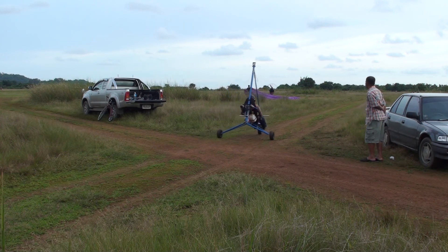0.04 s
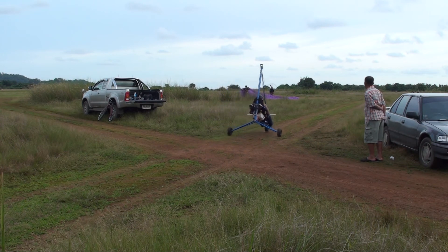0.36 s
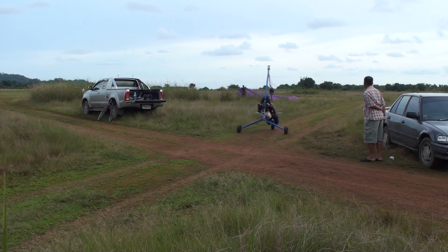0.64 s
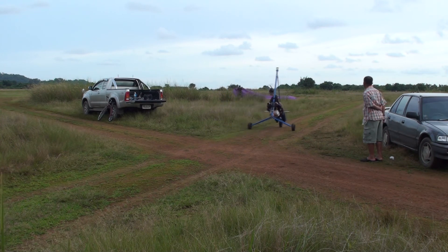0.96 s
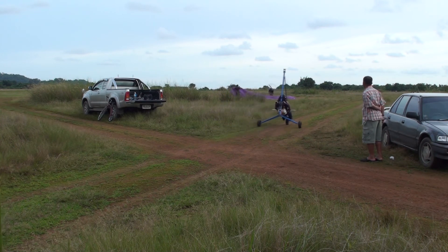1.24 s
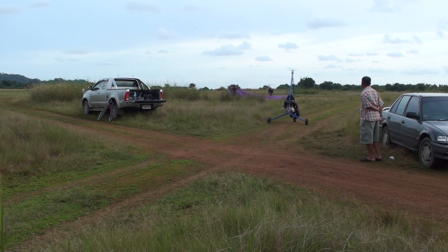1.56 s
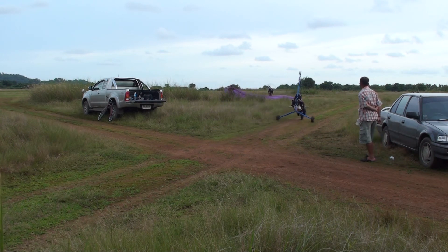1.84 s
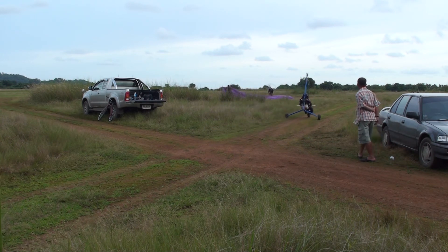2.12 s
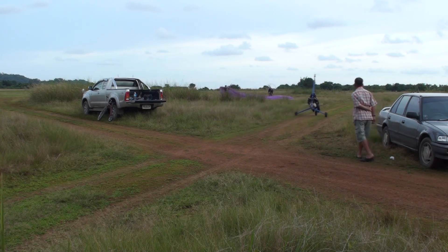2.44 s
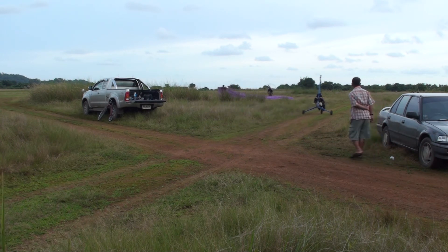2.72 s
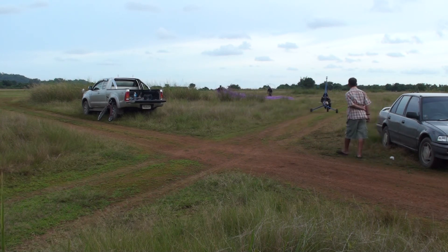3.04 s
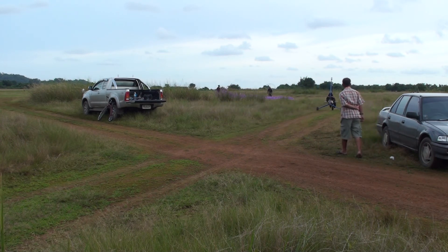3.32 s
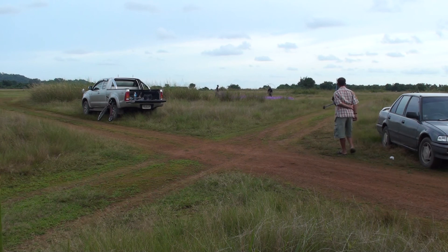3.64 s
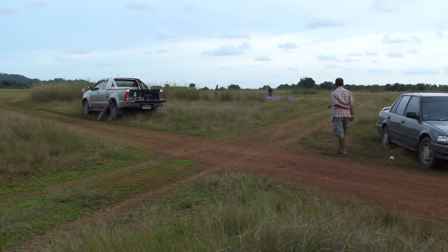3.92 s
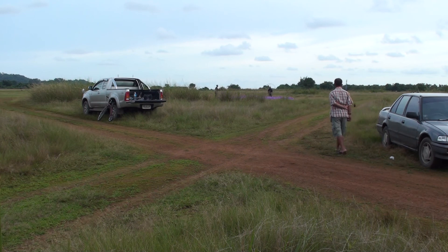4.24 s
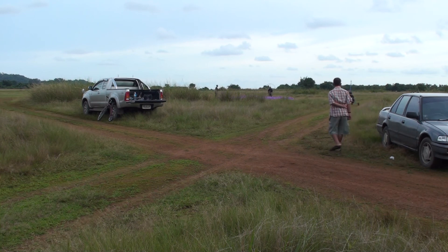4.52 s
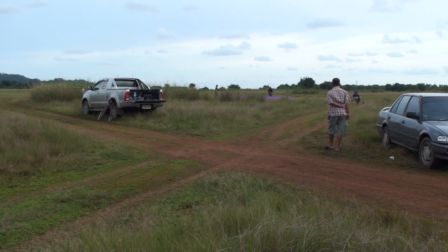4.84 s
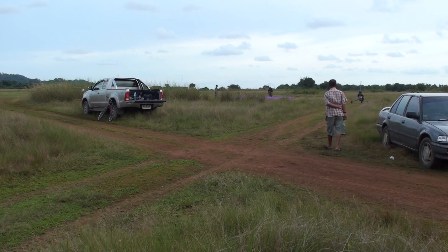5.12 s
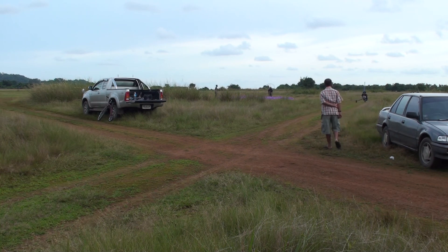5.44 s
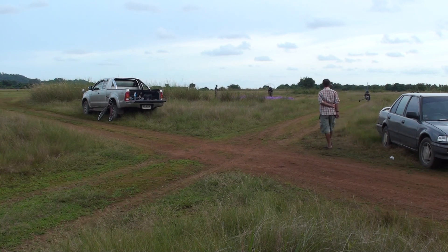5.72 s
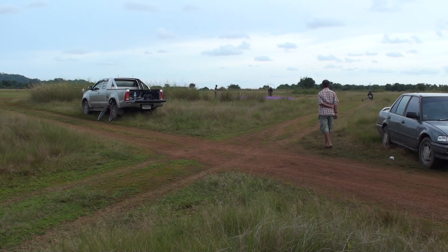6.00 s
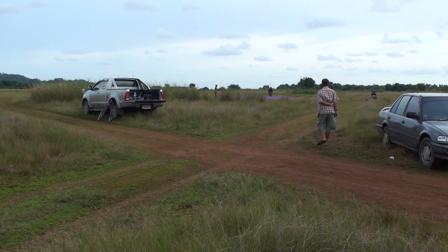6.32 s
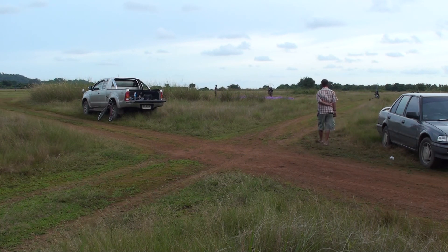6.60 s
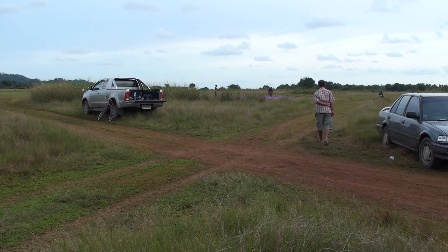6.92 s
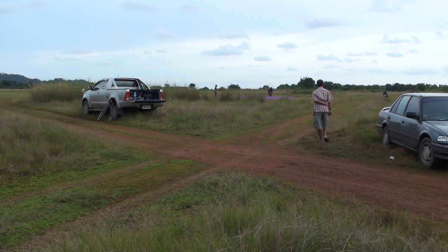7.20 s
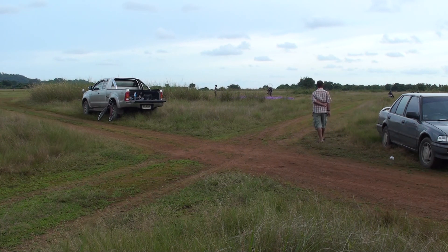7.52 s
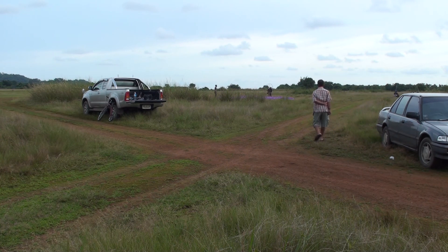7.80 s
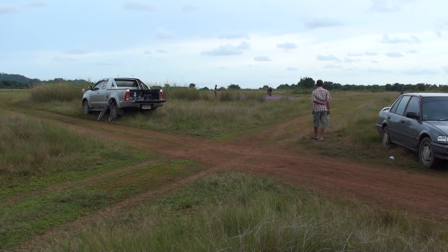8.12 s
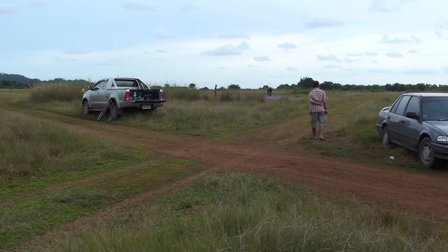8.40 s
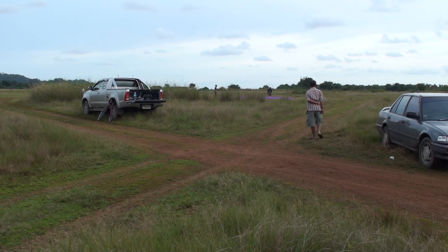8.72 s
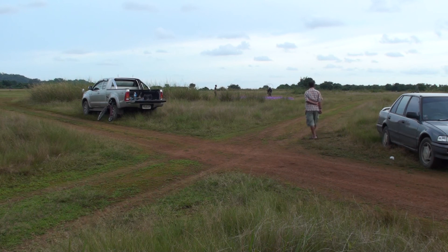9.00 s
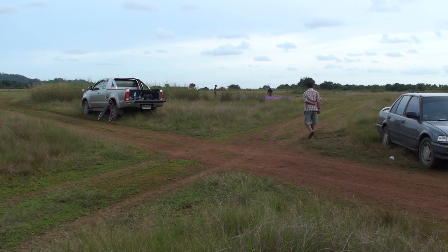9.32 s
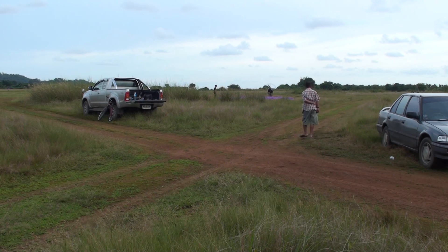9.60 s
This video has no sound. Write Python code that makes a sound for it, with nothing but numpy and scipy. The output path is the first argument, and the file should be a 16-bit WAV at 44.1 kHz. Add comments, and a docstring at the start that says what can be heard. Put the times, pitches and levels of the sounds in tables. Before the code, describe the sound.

A three-wheeled craft with two small jet turbines rolls away across an open grassy field. Its loud, rushing roar swells and swirls under a very high whine. After about four seconds it throttles back: the roar sinks and the whine splits into two tones gliding steadily down. Heard in stereo from a fixed spot, it fades toward the right over a low rumble and faint hiss.

```python
"""On a grassy field, a stereo pair of microphones hears a trike with two small jet turbines roll away.
Close by at first, the exhausts roar, swelling briefly and coloured by moving echoes off the ground and
a parked car, while the two shafts whine at nearly one pitch. After four seconds it throttles back: the
roar sinks and the whines part as they spool down. Farther out it bears right and the whines' octaves
emerge, over the low rumble and faint hiss that lie on the field throughout."""
import sys
import numpy as np
from scipy import signal
from scipy.fft import rfft, irfft
from scipy.io import wavfile

SR = 44100
rng = np.random.default_rng(int(sys.argv[2]) if len(sys.argv) > 2 else 0)


def persist_wave(psi):
    """Save psi, clipped to +-1, as 16-bit WAV."""
    counts = np.round(np.clip(psi, -1, 1) * 32767).astype(np.int16)
    wavfile.write(sys.argv[1], SR, np.atleast_2d(counts).T)


N = 429975
FRAME, HOP = 1024, 256
TIME = np.arange(N) / SR
FRAME_S = np.arange(N // HOP + 2) * HOP / SR
BIN_HZ = np.maximum(np.arange(FRAME // 2 + 1) * SR / FRAME, 1)
CUTOFF_HZ = 15600


def from_db(db):
    """Decibels to gain."""
    return 10 ** (np.asarray(db) / 20)


def in_time(rows, times):
    """The columns of a curve, read at the given times."""
    time_s, *columns = np.transpose(rows)
    return [np.interp(times, time_s, column) for column in columns]


def in_pitch(rows):
    """The columns of a spectrum, read at every frequency bin."""
    hz, *columns = np.transpose(rows)
    return [np.interp(np.log(BIN_HZ), np.log(hz), column)[:, None] for column in columns]


def octaves_from(centre_hz):
    """Distance of every frequency bin from a pitch."""
    return np.log2(BIN_HZ[:, None] / centre_hz)


def glide(start_s, end_s, first, last, fade_share=0.15):
    """A value slides from first to last as the trike passes a patch of ground; also its presence 0-1."""
    progress = np.clip((FRAME_S - start_s) / (end_s - start_s), 0, 1)
    edge = np.minimum(np.minimum(progress, 1 - progress) / fade_share, 1)
    return first * (last / first) ** progress, np.sin(np.pi / 2 * edge)


# Phase by which the left microphone leads the right: pitch_hz, lead_rad
LEFT_LEAD = [(60, -0.78), (260, -0.75), (700, -0.62), (1640, -0.18), (4200, -0.51), (6500, 0.36),
             (9000, 0.99), (12000, -0.51)]

def stereo_noise(density, image):
    """Noise of the given amplitude per root Hz (bins x frames), placed between the microphones."""
    white = rng.standard_normal((2, (len(FRAME_S) - 1) * HOP)) * np.sqrt(SR / 2)
    common, apart = signal.stft(white, nperseg=FRAME, noverlap=FRAME - HOP)[2]
    pan_db, likeness = in_pitch(image)
    lead_rad, = in_pitch(LEFT_LEAD)
    common = common * np.sqrt((1 + likeness) / 2)
    apart = apart * np.sqrt((1 - likeness) / 2)
    lean = from_db(pan_db / 2) * np.exp(.5j * lead_rad)
    pair = np.array([(common + apart) * lean, (common - apart) / lean]) * 2 / abs(lean + 1 / lean)
    return signal.istft(pair * density, nperseg=FRAME, noverlap=FRAME - HOP)[1][:, :N]


# Soft grass between trike and microphones:
# start_s, end_s, first_hz, last_hz, half_width_octaves, depth_db
GRASS_PATCHES = [(-.1, .53, 820, 840, .18, 4), (-.3, .89, 2390, 2600, .12, 2.5),
                 (.7, 1.61, 2880, 3340, .082, 4), (.15, 1.38, 560, 660, .22, 6),
                 (.85, 1.5, 850, 1080, .16, 4), (1.5, 2.15, 1200, 2250, .19, 7),
                 (2.1, 2.8, 2150, 2950, .13, 5), (4.05, 4.5, 1400, 1500, .25, 8),
                 (4.41, 6.1, 1260, 1420, .14, 5), (6, 7, 2900, 3000, .11, 3),
                 (4.3, 6.15, 1040, 950, .17, 7), (5.85, 7.9, 900, 730, .13, 6.5),
                 (7.55, 8.3, 3100, 2000, .2, 5), (8.05, 8.65, 2000, 1000, .3, 7),
                 (8.35, 10.1, 1060, 820, .3, 7)]

def grass():
    """Each patch swallows a band that slides with the angle of the path to the microphones."""
    loss_db = 0
    for *path, width_octaves, depth_db in GRASS_PATCHES:
        centre_hz, presence = glide(*path)
        band = np.exp(-(octaves_from(centre_hz) / width_octaves) ** 2)
        loss_db = loss_db + depth_db * presence * band
    return from_db(-loss_db)


def reflection(lag_ms, strength, blur_hz, low_hz):
    """A late copy cuts a comb; long waves bend round the reflector and its unevenness blurs the top."""
    hz = BIN_HZ[:, None]
    turns = hz * lag_ms / 1000
    returned = strength / (1 + (hz / blur_hz) ** 2) / (1 + (low_hz / hz) ** 2)
    return abs(1 + returned * np.exp(-2j * np.pi * turns))


# Echo off a parked car: time_s, lag_ms, strength_ratio
PARKED_CAR = [(0, 4.8, .12), (.5, 4.3, .35), (.8, 3.5, .52), (1.1, 2.62, .55), (1.47, 2.02, .42),
              (1.8, 1.1, .15), (2.2, .8, 0)]
# Hard ground that mirrors the jets: start_s, end_s, first_lag_ms, last_lag_ms, strength_ratio
HARD_GROUND = [(-2.25, 3.53, 0.98, 0.3, 0.17), (3, 5.9, 0.45, 0.48, 0.18), (5.5, 8.63, 0.51, 0.62, 0.52),
               (6.5, 10, 0.79, 0.61, 0.15)]

def echoes():
    """Car and ground echoes reach the microphones just behind the roar; their combs move as it rolls."""
    gain = reflection(*in_time(PARKED_CAR, FRAME_S), blur_hz=5000, low_hz=402)
    for *path, strength in HARD_GROUND:
        lag_ms, presence = glide(*path)
        gain = gain * reflection(lag_ms, strength * presence, blur_hz=4100, low_hz=60)
    return gain


# Brief swells and dips in sliding bands of the roar at the microphones, some broad, some narrow:
# peak_s, rise_s, centre_hz, half_width_octaves, lift_db, climb_octaves_per_rise
ROAR_SWELLS = [(.18, 0.16, 1190, 0.15, 4.5, 0.31), (.56, 0.14, 1580, .25, 3.5, 0.12),
               (1.019, 0.091, 1220, 0.12, 8, .05), (1.09, 0.067, 1930, .12, 7, 0.0094),
               (1.28, 0.24, 2350, 0.19, 2, 0.088), (1.25, .35, 4050, .14, 2.5, 0.14),
               (1.47, 0.22, 700, 0.19, 6.5, 0.27), (1.61, 0.048, 2380, .15, 4, -0.048),
               (1.71, 0.06, 1820, .1, 11, 0.052), (1.63, 0.077, 5000, .8, 3.5, 0.0026),
               (1.92, 0.12, 2580, 0.15, 4, 0.043), (2.07, 0.12, 7150, 1.4, 5, .15),
               (2.18, 0.1, 1090, .6, 4.5, 0.41), (2.33, 0.06, 5200, .45, 3, 0.52),
               (2.43, 0.19, 5000, 1.06, 6.5, 0.12), (2.68, 0.12, 3600, 0.54, -1, 0.16),
               (2.9, .14, 3600, 1.1, 6, -0.062), (3.24, 0.084, 4530, 0.43, 6.5, 0.2),
               (3.36, 0.11, 3260, 0.3, 7.5, 0.17), (3.15, .15, 700, 0.28, 1.5, .35),
               (3.52, 0.32, 1350, 0.29, 2.5, .42), (3.6, 0.074, 6300, 0.69, 5.5, .15),
               (3.7, 0.067, 3290, 0.78, 6.5, 0), (3.87, 0.27, 2800, 0.31, -6.5, 0.14),
               (4.01, 0.041, 2600, .25, 6, 0.1), (4.07, 0.11, 4400, 0.94, 6.5, 0.44),
               (4.35, 0.059, 2650, 0.12, 7, -0.19), (4.68, 0.19, 2270, .44, 4, 0),
               (5.78, .2, 690, 0.14, 3.5, 0), (6.4, .22, 5600, 0.67, 3, -0.008),
               (6.72, 0.53, 2500, .14, 5.5, 0.07), (7.65, 0.36, 1580, 0.18, 4.5, -.08),
               (7.97, 0.14, 3400, 0.55, 5, -.05), (8.2, 0.34, 1230, 0.17, 2.5, -0.097),
               (9.6, .7, 2780, 0.13, 5, 0.036)]

def swells(fall_share=0.35):
    """A sliding band of the roar swells or dips, then returns more quickly (dB, bins x frames)."""
    total_db = 0
    for peak_s, rise_s, centre_hz, width_octaves, lift_db, climb in ROAR_SWELLS:
        age = (FRAME_S - peak_s) / rise_s
        swell = np.exp(-np.where(age < 0, age, age / fall_share) ** 2)
        offset_octaves = octaves_from(centre_hz) - climb * np.clip(age, -2, 2)
        total_db = total_db + lift_db * swell * np.exp(-(offset_octaves / width_octaves) ** 2)
    return total_db


# How much the air over the field swirls the roar: time_s, depth_db
SWIRL_DEPTH = [(0, 1.5), (2.3, 1.8), (5, 2), (9.75, 1.1)]

def swirl(rate_hz=11, climb_s=0.047, bands=36):
    """Moving air focuses and thins the roar in patches that climb in pitch (dB, bins x frames)."""
    log_pitches = np.linspace(np.log(300), np.log(CUTOFF_HZ), bands)
    moments_s = np.arange(400) / rate_hz - 1
    patches = rng.standard_normal((bands, len(moments_s)))
    delays_s = climb_s * (log_pitches - log_pitches[0])
    over_time = np.array([np.interp(FRAME_S - s, moments_s, row) for s, row in zip(delays_s, patches)])
    over_pitch = np.array([np.interp(np.log(BIN_HZ), log_pitches, row) for row in np.eye(bands)])
    depth_db, = in_time(SWIRL_DEPTH, FRAME_S)
    return depth_db * (over_pitch.T @ over_time)


# Low roar at the left microphone: time_s, gain_db
LEFT_BASS = [(3, -1.5), (4, 0), (5.3, -6), (9.75, -5.5)]

def low_lean(below_hz=700):
    """Farther out the low roar leans to the right (gain, microphones x bins x frames)."""
    lean_db, = in_time(LEFT_BASS, FRAME_S)
    left = from_db(lean_db / (1 + (BIN_HZ[:, None] / below_hz) ** 4))
    return np.array([left, np.ones_like(left)])


# Colour of the jets: pitch_hz, relative_density_db
JET_COLOUR = [(30.0, -48), (80.0, -25.5), (130.0, -17), (190.0, -9), (330.0, -2), (500.0, -1),
              (850.0, -0.5), (1300.0, 0), (1800.0, -2), (2500.0, -3.5), (3100.0, -5.5), (4300.0, -9),
              (6500.0, -11), (9700.0, -15.5), (11600.0, -16), (13500.0, -23.5), (15500.0, -40)]
# Rumble, roar, rush and hiss, from large eddies to small: low_hz, high_hz
EDDY_RANGES = [(80, 250), (250, 800), (1000, 2400), (2800, 4500)]
# Each range as the trike recedes, before swells, swirl, treble tilt and trim: time_s, level_db
RUMBLE_LEVEL = [(0, -41.5), (1.8, -41.5), (4.3, -48.5), (5.4, -55.5), (7.3, -70), (8.5, -58), (9.75, -52)]
ROAR_LEVEL = [(0, -36), (1.3, -31.5), (2.1, -33.5), (3.1, -30.5), (4.1, -33.5), (5.2, -39.5), (5.9, -42),
              (7.1, -48.5), (8.3, -51.5), (9.75, -60)]
RUSH_LEVEL = [(0, -26.5), (.6, -28), (1.15, -30), (1.6, -30.5), (1.9, -31.5), (2.15, -30.5), (2.35, -27),
              (2.8, -28.5), (3, -31), (3.2, -28.2), (3.5, -28), (3.72, -26), (3.85, -29.5), (4.03, -31.5),
              (4.13, -36), (4.6, -36), (5, -40), (5.25, -48), (5.9, -48), (6.15, -44), (6.55, -46.5),
              (7.15, -52.5), (8.05, -53), (8.45, -60.5), (9.75, -64.5)]
HISS_LEVEL = [(0, -32.5), (1.3, -33), (1.8, -36), (2.6, -38.5), (3.05, -38), (3.5, -36), (3.9, -38.5),
              (4.25, -40.5), (4.5, -43.5), (4.8, -46), (5.5, -54), (6.5, -54.5), (8.4, -64.5), (9.75, -72)]
# The jets between the microphones: pitch_hz, left_over_right_db, likeness_ratio
JET_STEREO = [(60, -7, 0.2), (120, -5.5, 0.17), (300, -3, 0.91), (700, -2.5, 1), (1300, -5, 0.87),
              (2380, -4.5, 0.9), (4940, -9.5, 0.79), (7600, -10, 0.64), (9700, -1.5, 0.5),
              (14000, -8.5, 0.8)]

def exhaust(air_knee_hz=4370):
    """Jet mixing noise: each range of eddy sizes has its own strength; the path combs and swirls it."""
    colour = from_db(in_pitch(JET_COLOUR)[0]) * grass() * echoes()
    tilt_db_per_octave = 2 - 0.48 * FRAME_S   # the air dulls the top with distance
    gain_db = swells() + tilt_db_per_octave * np.maximum(octaves_from(air_knee_hz), 0)
    log_centres = np.log(EDDY_RANGES).mean(axis=1)
    levels = [RUMBLE_LEVEL, ROAR_LEVEL, RUSH_LEVEL, HISS_LEVEL]
    for (low_hz, high_hz), curve, this_range in zip(EDDY_RANGES, levels, np.eye(len(levels))):
        level_db, = in_time(curve, FRAME_S)
        power = (colour[(BIN_HZ >= low_hz) & (BIN_HZ < high_hz)] ** 2).sum(axis=0) * SR / FRAME
        share = np.interp(np.log(BIN_HZ), log_centres, this_range)[:, None]
        gain_db = gain_db + share * (level_db - 10 * np.log10(power))
    return stereo_noise(colour * from_db(gain_db + swirl()) * low_lean(), JET_STEREO)


def drift(rate_hz, count=8192):
    """A smooth random curve of spread 1 that changes about rate_hz times a second."""
    hz = np.arange(count // 2 + 1) * SR / N
    slow = irfft(rfft(rng.standard_normal(count)) / (1 + (hz / rate_hz) ** 2), count)
    return np.interp(TIME, np.linspace(0, N / SR, count), slow / slow.std())


def whine(speed, levels, pan_db, wander_hz, flutter_hz, apart, scatter=0.3):
    """A shaft's tone and octave; the air scatters both, so they flutter apart at the two microphones."""
    shaft_hz, = in_time(speed, TIME)
    phase = 2 * np.pi * np.cumsum(shaft_hz + wander_hz * drift(5.67)) / SR
    pair = np.zeros((2, N))
    for harmonic, curve in enumerate(levels, 1):
        level_db, = in_time(curve, TIME)
        shared = 1 + scatter * (drift(flutter_hz) + 1j * drift(flutter_hz))
        fading = shared + apart * np.array([drift(flutter_hz), drift(flutter_hz)])
        rms = np.sqrt(np.mean(abs(fading) ** 2) / 2)
        tone = np.real(fading * np.exp(1j * harmonic * phase)) / rms
        pair += tone * from_db(level_db) * (harmonic * shaft_hz < SR / 2)
    return pair * from_db([[pan_db / 2], [-pan_db / 2]])


# Speed of each shaft: time_s, pitch_hz
SHAFT_A = [(0, 11365), (.55, 11420), (2.2, 11425), (3.1, 11395), (4.25, 11380), (4.4, 11270), (4.55, 11120),
           (4.8, 10630), (5.25, 9760), (5.5, 9370), (6, 8780), (6.4, 8200), (7, 7395), (7.28, 7096),
           (7.55, 6850), (8, 6350), (8.45, 5840), (9, 5300), (9.5, 4835), (9.75, 4620)]
SHAFT_B = [(0, 11380), (.6, 11600), (1.7, 11610), (3.5, 11590), (4.1, 11600), (4.35, 11390), (4.55, 11140),
           (5, 10370), (5.5, 9600), (6, 9020), (6.4, 8570), (7, 8000), (7.75, 7170), (8, 6962), (9, 6222),
           (9.75, 5680)]
# Each shaft's tone, swelling and fading across the field, before trim and pan: time_s, level_db
TONE_A = [(0, -46), (.15, -54), (.5, -39), (1.55, -42), (1.7, -47), (2.1, -42), (2.65, -51), (3.05, -41.5),
          (3.34, -45), (3.55, -56), (3.9, -48), (4.35, -55), (4.54, -53), (4.95, -57), (5.5, -61),
          (5.7, -55), (6.2, -56), (6.55, -52.5), (6.95, -61), (7.33, -53), (7.48, -68), (7.66, -57),
          (8.05, -68), (8.33, -61), (8.62, -70), (9.12, -72), (9.53, -59), (9.75, -68)]
TONE_B = [(0, -49), (.2, -56), (.65, -46), (1.4, -48), (1.7, -49), (2, -48), (2.25, -41), (2.5, -51),
          (3.35, -50), (3.44, -38), (3.65, -49), (4.35, -58), (4.54, -45), (4.66, -58), (5.5, -64),
          (5.9, -59), (6.3, -54), (6.65, -54), (6.8, -65), (7.2, -55), (7.55, -61), (7.98, -51), (8.3, -59),
          (8.8, -63), (9.1, -67), (9.75, -68)]
# Their octaves, which emerge as the pitch sinks, before trim and pan: time_s, level_db
OVERTONE_A = [(6.65, -62), (6.8, -70), (7.21, -71), (7.3, -64), (7.5, -69), (7.76, -60), (7.9, -66),
              (8.14, -58), (8.38, -75), (8.74, -59), (9, -62.5), (9.47, -55.5), (9.75, -57)]
OVERTONE_B = [(7.11, -63), (7.25, -70), (7.5, -69), (7.61, -62), (7.75, -71), (7.85, -55), (7.99, -62),
              (8.17, -58), (8.55, -68), (8.96, -58), (9.22, -62), (9.35, -57), (9.75, -57)]

def turbines():
    """Two shafts, right of centre, hold full speed and then coast down at their own rates."""
    first = whine(SHAFT_A, [TONE_A, OVERTONE_A], pan_db=-6, wander_hz=4.1, flutter_hz=21, apart=0.47)
    second = whine(SHAFT_B, [TONE_B, OVERTONE_B], pan_db=-8.5, wander_hz=5.8, flutter_hz=15, apart=0.54)
    return first + from_db(-1.4) * second


# Background of the open field: pitch_hz, density_db
FIELD_COLOUR = [(30, -90), (80, -84), (170, -78.5), (300, -88), (500, -101), (900, -101), (1500, -101),
                (4000, -102), (6500, -102), (8500, -94), (11000, -101), (13000, -108), (15000, -119)]
# The field between the microphones: pitch_hz, left_over_right_db, likeness_ratio
FIELD_STEREO = [(60, -7, 0.63), (171, -19, 0.9), (600, -25, 0.4), (1500, 8, 0.26), (4400, -8, 0.39),
                (8000, -7, 0.38), (14000, 1, 0.37)]

def field():
    """A steady low rumble and faint hiss around the microphones."""
    return stereo_noise(from_db(in_pitch(FIELD_COLOUR)[0]), FIELD_STEREO)


# The trike bears right, seen from the microphones: time_s, left_over_right_db
TRIKE_BEARING = [(0, 1.2), (4, 0), (5.5, 0), (8, -2), (9.75, -4.5)]

def scene():
    """Roar and whines move off together over the sound of the field."""
    trike = turbines() + from_db(0.68) * exhaust()
    bearing_db, = in_time(TRIKE_BEARING, TIME)
    return trike * from_db([bearing_db / 2, -bearing_db / 2]) + field()


def record(dry):
    """Both microphone channels are cut steeply at the top."""
    return signal.sosfilt(signal.ellip(12, .1, 90, CUTOFF_HZ, fs=SR, output="sos"), dry)


dry = scene()
out = record(dry)
persist_wave(out)
```